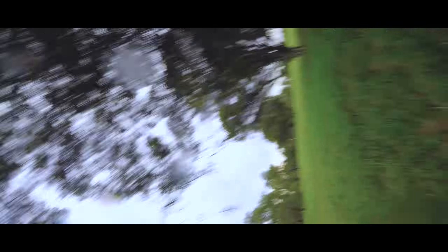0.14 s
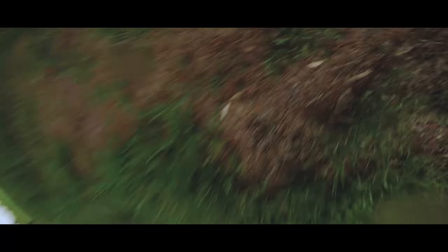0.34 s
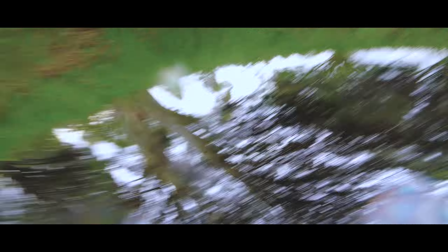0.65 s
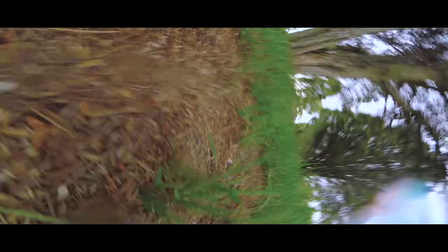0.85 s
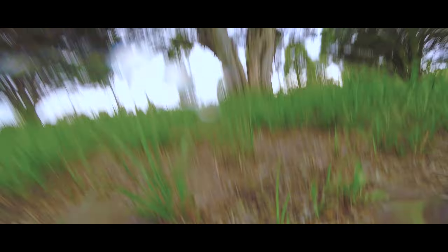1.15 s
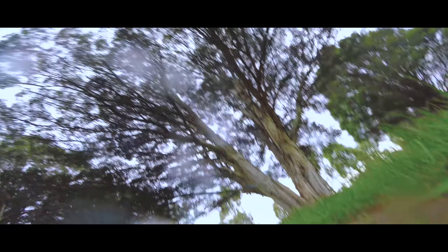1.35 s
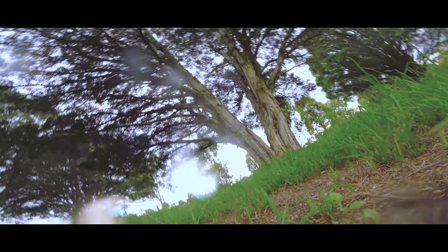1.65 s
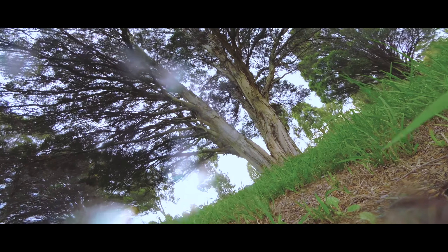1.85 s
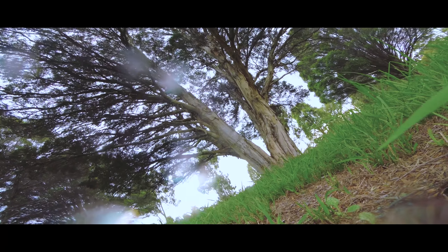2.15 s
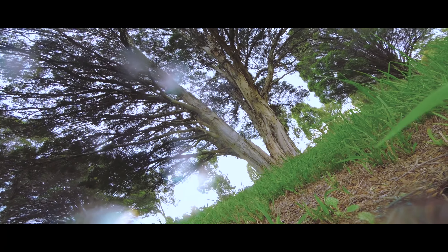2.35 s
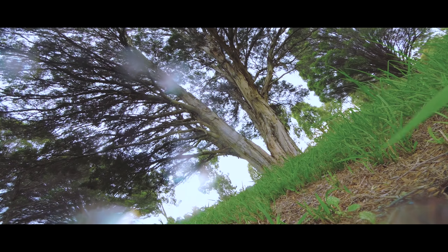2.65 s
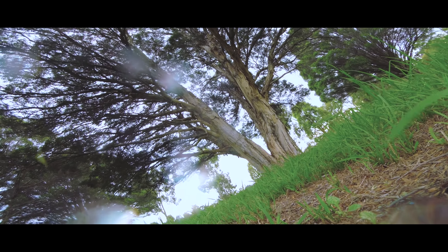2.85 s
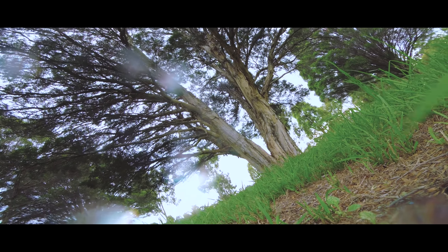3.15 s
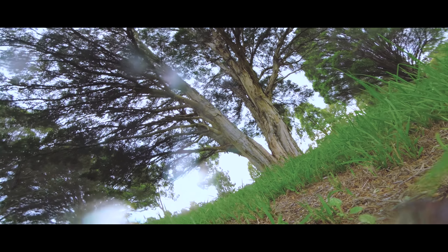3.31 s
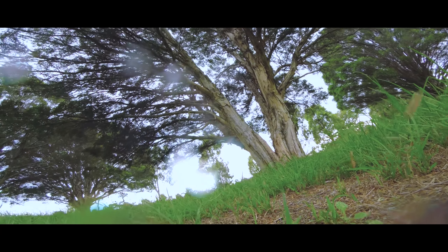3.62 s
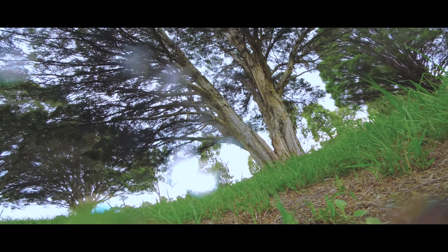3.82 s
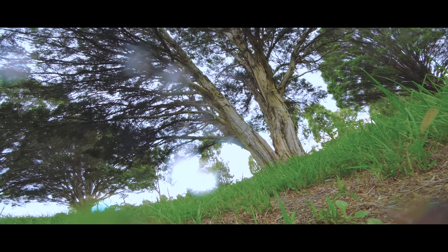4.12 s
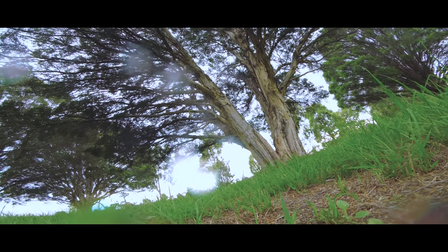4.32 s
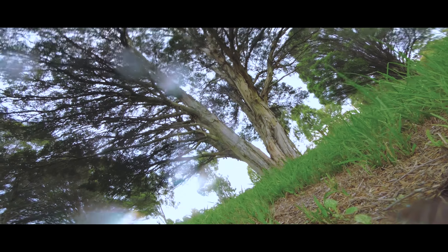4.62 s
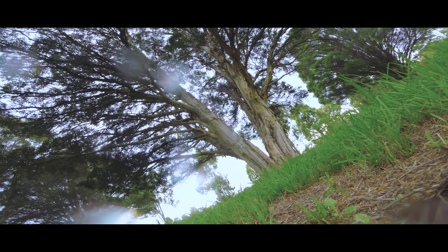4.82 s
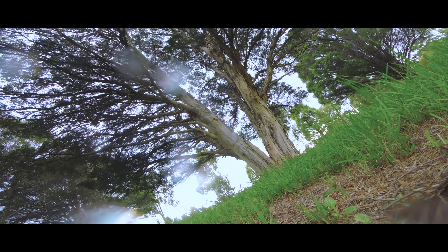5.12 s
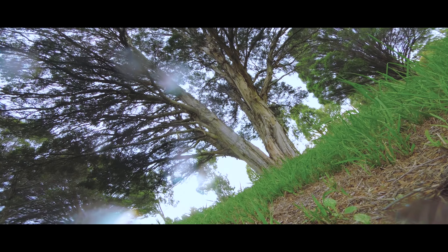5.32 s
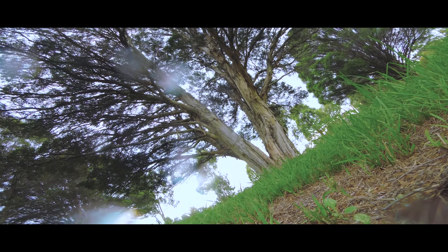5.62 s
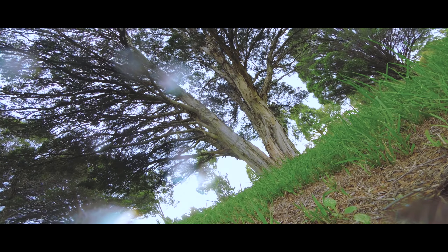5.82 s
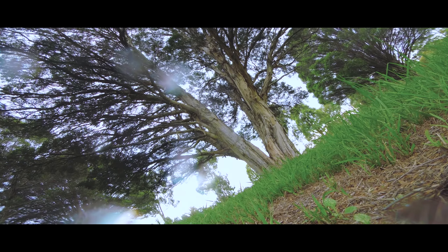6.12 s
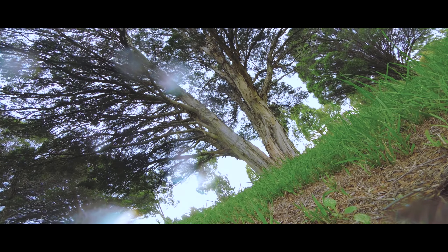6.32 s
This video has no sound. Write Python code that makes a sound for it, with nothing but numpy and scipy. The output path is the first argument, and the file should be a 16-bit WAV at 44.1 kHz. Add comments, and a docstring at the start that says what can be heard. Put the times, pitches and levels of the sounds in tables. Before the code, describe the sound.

Boomy close knocks and scrapes as a small drone crashes outdoors, followed by its blades whirring roughly in grass for two seconds.

```python
"""Dull knocks, scrapes and snaps: a small drone tumbles over twigs and turf and comes to rest.
Its motors then strain against the grass, shaking the frame, and cut out. The microphone sits in
the camera on the frame, so blows and shaking arrive through the structure, dull and boomy.
Wind rumbles on the microphone port over a faint outdoor hiss; near the end, distant birds chirp."""
import sys
import numpy as np
from scipy import signal
from scipy.fft import rfft, irfft, next_fast_len
from scipy.io import wavfile
from scipy.ndimage import map_coordinates

SR = 44100
rng = np.random.default_rng(int(sys.argv[2]) if len(sys.argv) > 2 else 0)


def digitize_waveform(pressure):
    """Quantize a signal to 16-bit integers and store it at the path in sys.argv[1].

    Rows of a 2-D input are taken as channels; values are limited to [-1, 1].
    """
    field = np.atleast_2d(pressure).T
    bounded = np.clip(field, -1, 1)
    quanta = np.round(bounded * 32767).astype(np.int16)
    wavfile.write(sys.argv[1], SR, quanta)


N = 285039
T = np.arange(N) / SR


def amp(db):
    """Decibels to amplitude."""
    return 10 ** (np.asarray(db) / 20)


def unit(x):
    """x scaled to rms 1."""
    return x / np.sqrt(np.mean(x ** 2) + 1e-20)


def curves(rows):
    """One level per sample for each column after the time; -120 dB outside the rows."""
    times, *columns = np.transpose(rows)
    return [np.interp(T, times, db, -120, -120) for db in columns]


def swell(start, length, rise_db_per_s, fall_db_per_s):
    """Gain that reaches 1 at start, holds for length seconds and falls."""
    rise_db = rise_db_per_s * (T - start)
    fall_db = fall_db_per_s * (start + length - T)
    return amp(np.minimum(0, np.minimum(rise_db, fall_db)))


def wobble(rate):
    """A smooth random curve, rate knots a second."""
    return map_coordinates(rng.standard_normal(int(N * rate / SR) + 4), [T * rate])


def filtered(x, response):
    """x through a complex response of frequency."""
    size = next_fast_len(N + SR // 2)
    return irfft(rfft(x, size) * response(np.fft.rfftfreq(size, 1 / SR)), size)[:N]


def modes(table):
    """Causal response of resonances, alternating in sign."""
    return lambda f: sum((-1) ** k * amp(db) * 1j * f * width / (hz * hz - f * f + 1j * f * width)
                         for k, (hz, width, db) in enumerate(table))


def steep(table):
    """Two passes through the same resonances: darker valleys."""
    return lambda f: modes(table)(f) ** 2


def blunt(response, hz):
    """Wood and soil are soft strikers: the response rolls off above hz."""
    return lambda f: response(f) / (1 + 1j * f / hz) ** 3


def tilt(points):
    """Response through (frequency [Hz], gain [dB]) points on a log axis."""
    hz, db = np.transpose(points)
    return lambda f: amp(np.interp(np.log(f + 1), np.log(hz), db, -120, -120))


def noise(response, grain_db=0, rate=300):
    """Coloured noise of rms 1, lumpy in time by grain_db."""
    return unit(filtered(amp(grain_db * wobble(rate)) * rng.standard_normal(N), response))


def struck(times, gains, response):
    """Each blow sets off the ringing of a response; a gain of 1 peaks at 1."""
    blows, impulse = np.zeros(N), np.zeros(N)
    np.add.at(blows, (np.asarray(times) * SR).astype(int), gains)
    impulse[0] = 1
    return filtered(blows, response) / np.abs(filtered(impulse, response)).max()


# Outdoor background hiss at the microphone: (time [s], level [dB])
BACKGROUND_LEVELS = [(0, -71.5), (.4, -78), (1.7, -72.5), (2.3, -65), (4.7, -66), (5.2, -60.5),
                     (6.46, -61.5)]
# Its broad body and its fine top: (frequency [Hz], gain [dB])
BROAD_HISS_SPECTRUM = [(180, -27), (300, 1.5), (623, -8.5), (729, -10.5), (1590, -15), (3180, -23),
                       (5050, -36.5), (5500, -32), (7150, -59.5), (12100, -120)]
FINE_HISS_SPECTRUM = [(2940, -29), (5000, -6.5), (5900, -6), (6380, -1), (7810, 1), (13100, -10),
                      (15000, -21)]

def background_hiss():
    """A faint outdoor hiss that grows louder toward the end."""
    level_db, = curves(BACKGROUND_LEVELS)
    broad_hiss = noise(tilt(BROAD_HISS_SPECTRUM))
    fine_hiss = amp(-14.5) * noise(tilt(FINE_HISS_SPECTRUM))
    return amp(level_db) * (broad_hiss + fine_hiss)


# Birds, off in the trees:
# (start [s], length [s], first pitch [Hz], last pitch [Hz], level [dB], rasp [0-1])
BIRD_NOTES = [(5.08, .03, 4800, 5800, -66, .6), (5.105, .04, 6100, 6500, -64, .6),
              (5.1, .03, 2700, 3150, -67, .5), (5.13, .08, 3150, 3200, -67, .4),
              (5.14, .05, 4250, 4200, -70, .5), (5.11, .04, 5000, 5700, -69, .9),
              (5.76, .04, 5700, 5900, -72, .7), (6.01, .07, 4200, 4150, -66, .7),
              (6.03, .05, 5100, 4900, -72, .9), (6.05, .03, 2500, 2900, -67, .5),
              (6.08, .03, 6400, 6500, -72, .9), (6.13, .015, 5400, 3900, -63, .3),
              (6.142, .02, 3900, 2900, -59, .3), (6.16, .065, 2800, 2650, -62, .2)]

def birds():
    """Gliding notes, some whistled, some rasped, with a little echo among the trees."""
    song, hoarse = np.zeros(N), unit(wobble(420))
    for start, length, from_hz, to_hz, db, rasp in BIRD_NOTES:
        at = int(start * SR) + np.arange(int(length * SR))
        progress = (T[at] - start) / length
        phase = 2 * np.pi * np.cumsum(from_hz * (to_hz / from_hz) ** progress) / SR
        whistle = np.sin(phase) + amp(-15) * np.sin(2 * phase)
        arch = np.sqrt(np.abs(np.sin(np.pi * progress)))
        song[at] += amp(db) * arch * (1 - rasp + rasp * hoarse[at]) * whistle
    tail = rng.standard_normal(SR // 4) * amp(-60 * T[:SR // 4] / .25)  # 60 dB down in 0.25 s
    echo = signal.fftconvolve(song, tail / np.linalg.norm(tail))[:N]
    return song + amp(-9) * echo


# Wind right on the microphone port: (time [s], level [dB])
WIND_LEVELS = [(0, -38), (.32, -52), (.52, -40), (.94, -49.5), (1.25, -41.5), (2.57, -41), (3.25, -25),
               (4.46, -25), (4.66, -37.5), (5.99, -36.5), (6.46, -45)]
# Its rumble: (frequency [Hz], gain [dB])
WIND_SPECTRUM = [(12, -30.5), (20, -6), (38, 4), (128, -6), (143, -3), (161, -19.5), (190, -7.5),
                 (214, -23), (241, -17.5), (350, -33.5), (460, -47), (770, -120)]

def wind():
    """Moving air, partly from the blades, makes a lumpy rumble on the port."""
    level_db, = curves(WIND_LEVELS)
    return amp(level_db + 0.63 * wobble(9)) * noise(tilt(WIND_SPECTRUM))


# The arms, heard through the camera mount: (start [s], length [s], low mode [dB], high mode [dB])
ARM_HUMS = [(0.065, 0.23, -38, -67), (4.502, 0.33, -39, -42)]

def arm_hum():
    """Two lightly damped arm modes, kept alive by small jolts, sag from their starting levels."""
    low, high = noise(steep([(308, 12, 0)])), noise(steep([(1040, 45, 0)]))
    low_sag_db_per_s, high_sag_db_per_s = 59, 183
    hum = np.zeros(N)
    for start, length, low_db, high_db in ARM_HUMS:
        age = np.clip(T - start, 0, None)
        gate = swell(start, length, rise_db_per_s=195, fall_db_per_s=195)
        hum += gate * amp(low_db - low_sag_db_per_s * age) * low
        hum += gate * amp(high_db - high_sag_db_per_s * age) * high
    return hum


# Twigs and grass stalks, close to the microphone: (time [s], body [dB], thin top [dB])
STALK_SNAPS = [(0.0654, -60.5, -65), (.4496, -55, -61), (0.4606, -41, -48), (0.4723, -30, -48),
               (0.4875, -44, -61), (.6246, -63, -83), (0.67, -67, -85), (0.8532, -57, -70),
               (1.1346, -62.5, -78), (1.2507, -54, -74), (1.4804, -64, -77), (1.519, -64, -86),
               (1.7723, -72, -80), (2.429, -36, -48.5), (2.6804, -43, -55), (2.771, -37.5, -53),
               (2.8387, -38.5, -48), (3.078, -31, -47.5), (3.4854, -32.5, -39), (3.5139, -34, -48),
               (3.6917, -38, -50), (3.7473, -40, -51), (3.8142, -37, -49), (4.0778, -36, -52),
               (4.2883, -36.5, -48), (4.3384, -32.5, -46), (4.4562, -31.5, -57), (4.53, -60, -73),
               (4.645, -60.5, -75.5), (5.844, -67, -78)]

def snaps():
    """Each stalk breaks in a few milliseconds of noise with a thin top."""
    times, body_db, top_db = np.transpose(STALK_SNAPS)
    burst = lambda f: 1 / (1 + 1j * f / 110) ** 2  # envelope: quick rise, short fade
    body = noise(tilt([(1800, -22), (3000, -8), (5000, 0), (6500, 0), (9000, -16)]))
    top = noise(tilt([(6000, -22), (9000, 0.5), (11500, -9.0), (14800, -27.0)]))
    return struck(times, amp(body_db), burst) * body + struck(times, amp(top_db), burst) * top


# The craft's resonances around the microphone: (frequency [Hz], width [Hz], gain per pass [dB])
FRAME_MODES = [(130.7, 56, -1), (200.6, 83.3, 3), (309.2, 77.6, -0.5), (425, 150, -6)]  # arms and plates
HOUSING_MODES = [(991, 230, -2), (1454, 250, 5), (1752, 383, 3.5), (2580, 500, -12)]  # camera housing
BAY_MODES = [(730, 400, 2.5), (980, 67, -3)]  # battery bay
PORT_MODES = [(3700, 350, -14.5), (4960, 780, -10), (6030, 730, -8), (8600, 3500, -15)]  # cavities before the microphone
# Ground litter against the craft: (start [s], length [s], frame [dB], housing [dB], crackle [dB])
LITTER_SLIDES = [(.01, 0.21, -45, -66.5, -87), (.25, 0.18, -54, -75.5, -98.5), (0.454, .02, -39, -61, -55),
                 (0.473, 0.015, -2, -30, -48.5), (0.502, .06, -41.5, -60, -80),
                 (.575, 0.068, -39, -54.5, -70), (0.658, .13, -52.5, -66, -85),
                 (0.835, 0.032, -32.5, -50.5, -71.5), (0.869, 0.057, -42, -64, -83),
                 (0.933, 0.177, -52.5, -75, -89), (1.124, 0.067, -42, -61, -75),
                 (1.238, 0.025, -25.5, -47, -66.5), (1.272, .07, -36, -65, -84),
                 (1.357, 0.11, -44, -60.5, -77), (1.473, 0.019, -34, -55, -76),
                 (1.499, 0.043, -45.5, -68, -79), (1.666, .17, -47.5, -72, -84),
                 (4.533, 0.084, -41.5, -56, -71), (4.628, 0.047, -33.5, -61.5, -74)]

def slides():
    """Litter drags along the frame: uneven rubbing in the craft's resonances."""
    frame_gain, housing_gain, crackle_gain = sum(
        amp(levels_db)[:, None] * swell(start, length, rise_db_per_s=1000, fall_db_per_s=1497.5)
        for start, length, *levels_db in LITTER_SLIDES)
    frame = noise(steep(FRAME_MODES), grain_db=3, rate=60)
    housing = noise(blunt(steep(HOUSING_MODES + BAY_MODES[:1]), hz=2500), grain_db=2, rate=130)
    crackle = noise(steep(PORT_MODES), grain_db=3.5, rate=620)
    return frame_gain * frame + housing_gain * housing + crackle_gain * crackle


# The mount that carries camera and microphone: (frequency [Hz], width [Hz], gain [dB])
MOUNT_MODES = [(48.9, 14.2, 7.5), (96, 34, -12)]
# Jolts of the whole craft on the turf: (time [s], level [dB], direction of the push [+1 or -1])
CRAFT_JOLTS = [(0.085, -32, -1), (.36, -30.5, -1), (.454, -20, -1), (.476, -6.5, -1), (.496, -8.5, 1),
               (0.516, -23, 1), (.584, -20, 1), (0.641, -28.5, 1), (0.874, -18.5, -1), (1.237, -13, 1),
               (1.251, -18, -1), (1.463, -16.5, 1), (1.474, -17.5, -1), (1.52, -22, 1), (1.67, -33, -1),
               (2.402, -19, 1), (4.57, -14, 1), (4.65, -19, 1)]

def thuds():
    """A landing or lurch rocks the camera on its mount with a low boom."""
    times, db, direction = np.transpose(CRAFT_JOLTS)
    return struck(times, amp(db) * np.sign(direction), blunt(modes(MOUNT_MODES), hz=200))


# Lightly damped modes of the arms: (frequency [Hz], width [Hz], gain [dB])
ARM_MODES = [(190, 14, -6), (308, 7, 0), (470, 16, -12), (1040, 22, -15), (1600, 50, -24)]
# Blows, centimetres from the microphone: (time [s], frame [dB], battery bay [dB], housing [dB])
CRAFT_BLOWS = [(0.012, -32, -64, -52), (0.029, -38, -69, -53), (.048, -50, -68, -50), (.087, -24, -52, -48),
               (0.123, -41, -64, -48), (0.149, -43, -64, -48), (0.185, -53, -64, -61),
               (0.208, -47, -45, -52), (.228, -51, -64, -53), (.443, -34, -52, -52), (.464, -15, -28, -25),
               (.469, -11.5, -11.5, -20), (.487, -9, -10, -15.5), (.554, -54, -39, -46),
               (0.587, -29.5, -53, -57), (.626, -38, -49, -45), (.725, -38, -64, -53),
               (0.756, -35.5, -61, -44.5), (0.833, -22.5, -37, -36.5), (1.164, -32, -66, -52),
               (1.235, -27, -35, -62), (1.253, -22.5, -37, -32), (1.326, -39, -40, -72),
               (1.468, -35, -45, -56), (1.479, -25, -37, -33), (1.519, -35.5, -56, -62),
               (1.563, -40, -46, -74), (1.697, -46, -41, -71.5), (1.794, -35.5, -67, -73),
               (2.342, -23, -37, -35.5), (2.398, -22, -33, -17), (4.49, -45, -42, -32),
               (4.527, -28, -47, -46), (4.593, -46, -45, -47), (4.631, -32.5, -64, -50)]

def knocks():
    """A blow sounds the frame, battery bay and housing; the arms ring on after it."""
    times, frame_db, bay_db, housing_db = np.transpose(CRAFT_BLOWS)
    frame = struck(times, amp(frame_db), steep(FRAME_MODES))
    arms = struck(times, amp(frame_db - 19), modes(ARM_MODES))
    bay = struck(times, amp(bay_db), blunt(steep(BAY_MODES), hz=1480))
    housing = struck(times, amp(housing_db), blunt(steep(HOUSING_MODES), hz=3025))
    return frame + arms + bay + housing


def shaft(rows, overtones_db, drift):
    """An unbalanced shaft shakes the frame at its turning rate and multiples; speed and load flutter."""
    times, turn_hz, *columns = np.transpose(rows)
    flutter = wobble(18) + .7 * wobble(45) + .5 * wobble(130)
    phase = 2 * np.pi * np.cumsum(np.interp(T, times, turn_hz) * (1 + drift * flutter)) / SR
    levels_db = [np.interp(T, times, db) for db in columns]
    levels_db += [levels_db[-1] + db for db in overtones_db]  # relative to the last column
    gate = np.clip(np.minimum(T - times[0], times[-1] - T) / .015 + 1, 0, 1) ** 2  # 15 ms edges
    tones = np.zeros(N)
    for k, db in enumerate(levels_db):
        flicker_db = (1.2 + k) * wobble(16) + (1 + 1.5 * k) * wobble(45)
        tones += amp(db + flicker_db) * np.sin((k + 1) * phase)
    return np.sqrt(2) * gate * tones


# Rotor tones, carried along the arms to the microphone: (time [s], turning rate [Hz], level [dB])
MID_TONE = [(2.35, 216, -21.5), (2.46, 194.8, -21), (2.54, 223.6, -17.5), (2.65, 212.7, -19.5),
            (2.782, 225.9, -17), (2.9, 272.4, -21.5), (2.97, 197.2, -26), (3.05, 186.4, -14),
            (3.192, 193.8, -23.5), (3.25, 260, -23)]
HIGH_TONE_FIRST_RUN = [(2.36, 301.8, -32), (2.432, 307, -19.5), (2.47, 286.7, -17.5), (2.54, 335.8, -26),
                       (2.722, 318, -25), (2.752, 299, -29), (2.82, 330, -30)]
HIGH_TONE_SECOND_RUN = [(3.05, 332.8, -36.5, -54), (3.13, 327.9, -23, -61), (3.242, 312.3, -32.5, -42.5),
                        (3.384, 358.8, -20.5, -34.5), (3.48, 363.4, -19.5, -39), (3.54, 311.8, -22, -39),
                        (3.65, 287, -33, -42.5), (3.78, 282.6, -34.5, -38), (3.832, 301, -40, -38),
                        (3.89, 278.1, -45, -38.5), (4.116, 305.1, -47, -36.5), (4.252, 287.8, -55, -38),
                        (4.326, 295.7, -45.5, -36), (4.5, 250.3, -33, -42.5)]  # with a fourth column: second harmonic [dB]
LOW_TONE_RUNS = [
    [(2.5, 108, -33), (2.7, 107.7, -25.5), (2.85, 102, -38)],
    [(3.45, 130.3, -31), (3.598, 124.2, -21), (3.748, 96.53, -26), (3.95, 110.6, -24.5),
     (4.022, 99.96, -22.5), (4.122, 117.2, -24), (4.308, 108.9, -19.5), (4.4, 107.2, -21),
     (4.52, 119.9, -38)],
]  # two runs, a list of rows for each

def rotor_tones():
    """Wavering rotor tones at low, middle and high pitch; the low and the high one sound twice."""
    return (shaft(MID_TONE, overtones_db=[-16, -26], drift=.012)
            + shaft(HIGH_TONE_FIRST_RUN, overtones_db=[-25], drift=.01)
            + shaft(HIGH_TONE_SECOND_RUN, overtones_db=[-7, -15, -17, -18], drift=.015)
            + sum(shaft(run, overtones_db=[-13], drift=.0287) for run in LOW_TONE_RUNS))


# Motors under load in the grass beside the microphone, from first jerk to cut:
# (time [s], shaking [dB], housing buzz [dB], hiss [dB], whine [dB])
STRAIN_LEVELS = [(2.33, -45, -79, -74, -82), (2.345, -23, -32.5, -52, -68), (2.37, -25.5, -43, -55, -75),
                 (2.4, -16.5, -27, -38.5, -44), (2.52, -18.5, -32.5, -42, -59.5),
                 (2.72, -22.5, -32, -43, -66), (2.81, -17.5, -30, -37, -51), (2.97, -22.5, -33, -40.5, -53),
                 (3.12, -20.5, -33.5, -42.5, -65), (3.23, -18.5, -33.5, -36, -47.5),
                 (3.56, -23, -30, -37.5, -47.5), (3.91, -26.5, -30, -40, -62.5),
                 (4.18, -20.5, -30.5, -36, -40), (4.26, -26, -30, -38, -56), (4.46, -21, -29, -37.5, -42),
                 (4.51, -30.5, -37, -55.5, -61), (4.57, -56, -68, -75, -89)]
# Their colours at the camera: (frequency [Hz], gain [dB])
SHAKE_SPECTRUM = [(15, -43.5), (25, -13), (118, 1.5), (231, 2), (287, -1.5), (323, 0), (409, -11),
                  (476, -8), (536, -16.5), (1200, -21.5), (1400, -28), (1820, -41.5), (3080, -120)]
WHOLE_GRASS_SPECTRUM = [(1290, -23), (2200, -0.5), (2440, -3), (3450, -21), (4020, -13), (4460, -18.5),
                        (5230, -12.5), (6250, -11), (6930, -24), (8410, -21.5), (10900, -33.5),
                        (13300, -46), (15000, -59.5)]
SHREDDED_GRASS_SPECTRUM = [(1290, -7), (2200, -1), (3800, -12), (4830, -7.5), (5670, -10.5), (6350, -8.5),
                           (6880, -15), (9180, -24), (13100, -48), (15000, -51.5)]

def straining_motors():
    """Blades beat the grass: shaking, housing buzz and hiss surge with the load; whine and rattle waver."""
    shake_db, buzz_db, hiss_db, whine_db = curves(STRAIN_LEVELS)
    load = wobble(24.78)
    shake = amp(shake_db + 0.65 * load) * noise(tilt(SHAKE_SPECTRUM), grain_db=2.5, rate=50)
    arms = amp(-4.5) * filtered(shake, modes(ARM_MODES))  # they ring on when the motors cut
    buzz = amp(buzz_db + 0.71 * load) * noise(steep(HOUSING_MODES), grain_db=2, rate=240)
    hollow_whirr = noise(tilt(WHOLE_GRASS_SPECTRUM), grain_db=2.5, rate=230)
    full_whirr = noise(tilt(SHREDDED_GRASS_SPECTRUM), grain_db=2, rate=1100)
    shredding = np.interp(T, (2.74, 3.7), [0, np.pi / 2])  # the whirr fills in as the grass shreds
    whirr = np.cos(shredding) * hollow_whirr + np.sin(shredding) * full_whirr
    hiss = amp(hiss_db + 0.76 * load) * whirr
    whine = amp(whine_db + 1.86 * wobble(12)) * noise(steep([(6273, 85, 0)]))
    rattle = amp(hiss_db - 21 + 3.4 * wobble(12)) * noise(steep([(4010, 270, 0)]))
    return shake + arms + buzz + hiss + whine + rattle


def scene():
    """Everything that reaches the camera's one microphone, down in the grass."""
    background = background_hiss() + birds() + wind()
    tumble = arm_hum() + snaps() + slides() + thuds() + knocks()
    return (background + tumble + rotor_tones() + straining_motors())[None]


def record(dry):
    """The input stage rounds off the loudest blows; nothing is kept above the band limit."""
    ceiling, band_limit_hz = .64, 15100
    rounded = dry[0] / (1 + np.abs(dry[0] / ceiling) ** 6) ** (1 / 6)
    return filtered(rounded, lambda hz: hz < band_limit_hz)[None]


dry = scene()
out = record(dry)
digitize_waveform(out)
```